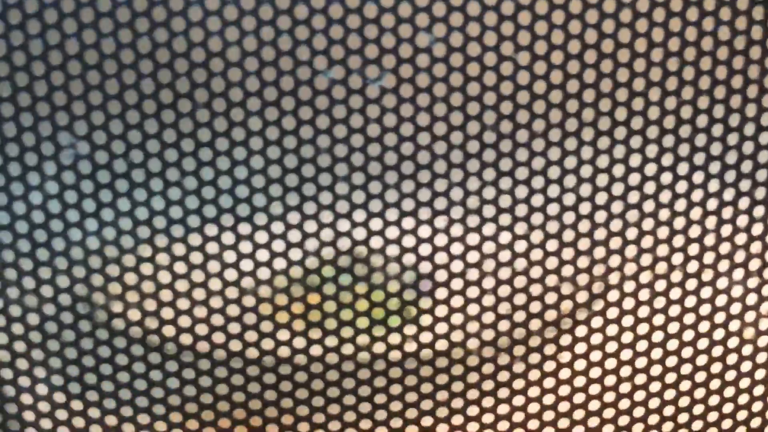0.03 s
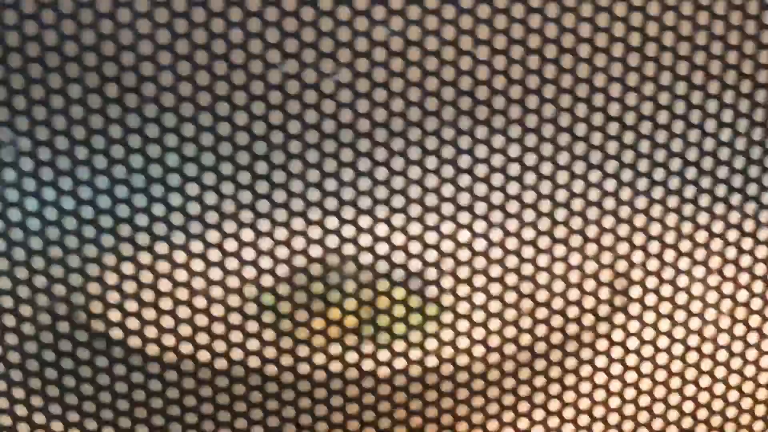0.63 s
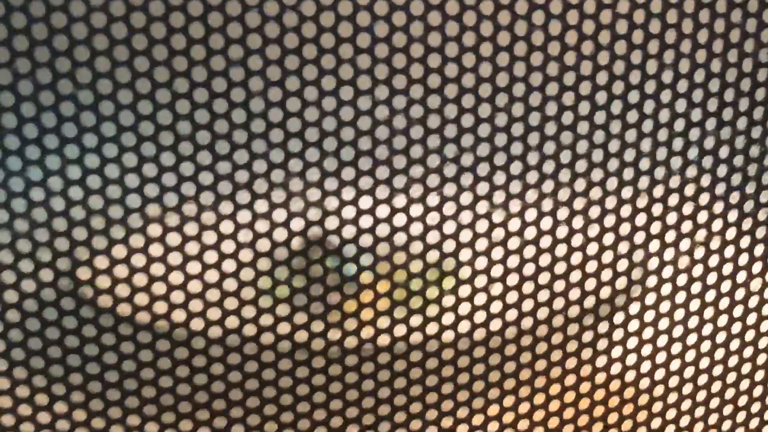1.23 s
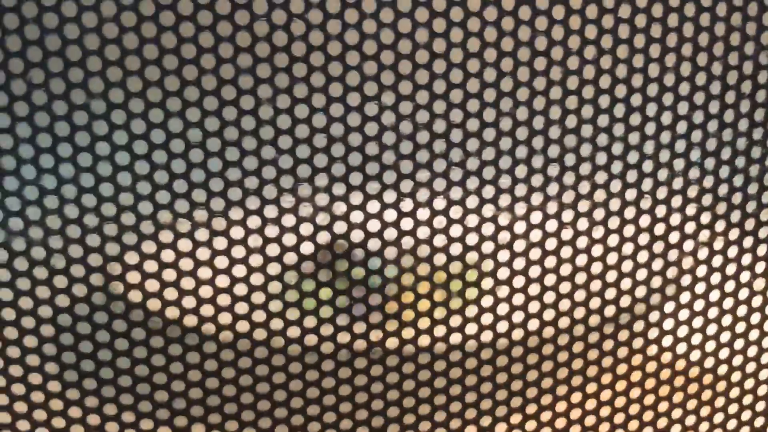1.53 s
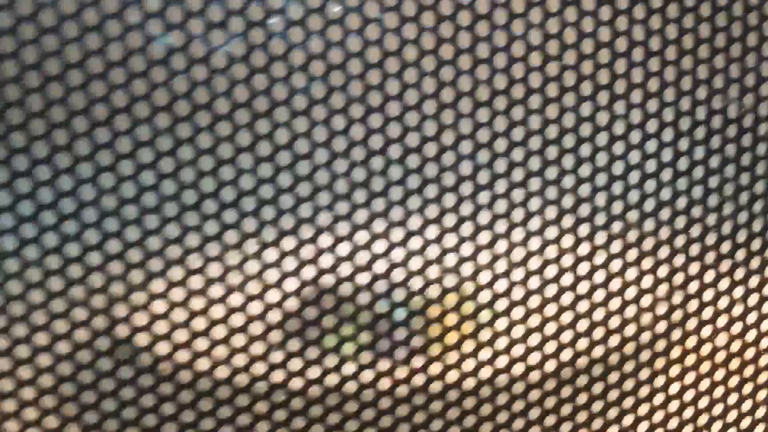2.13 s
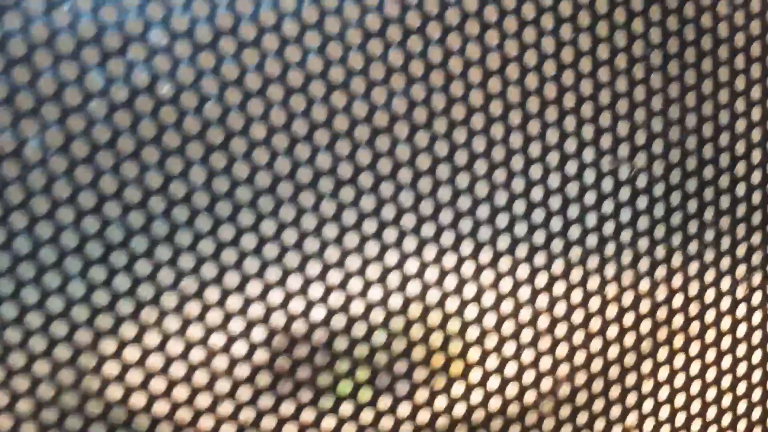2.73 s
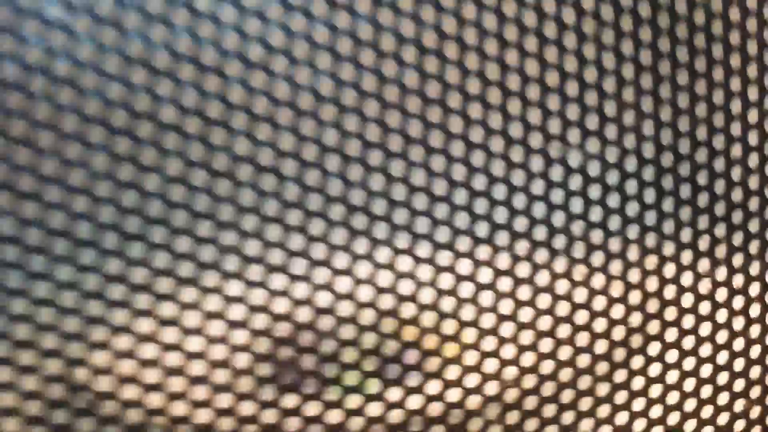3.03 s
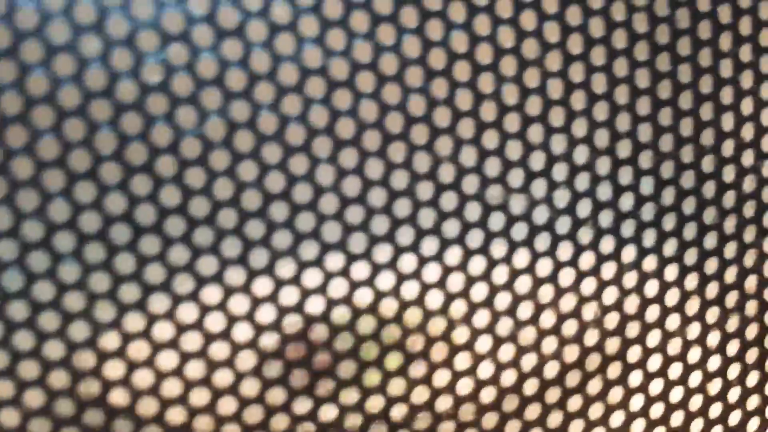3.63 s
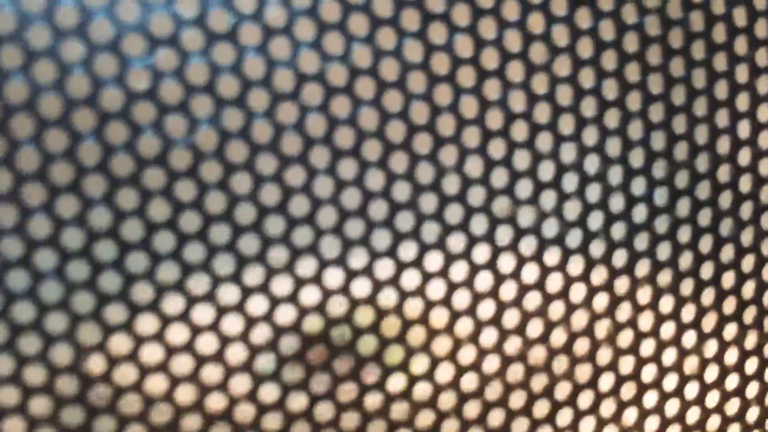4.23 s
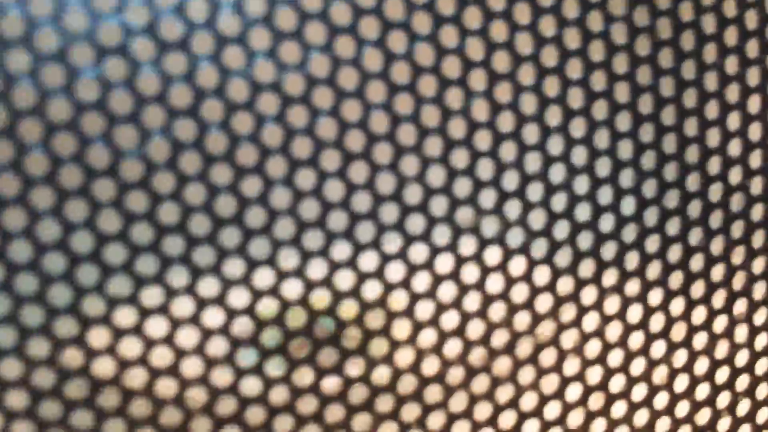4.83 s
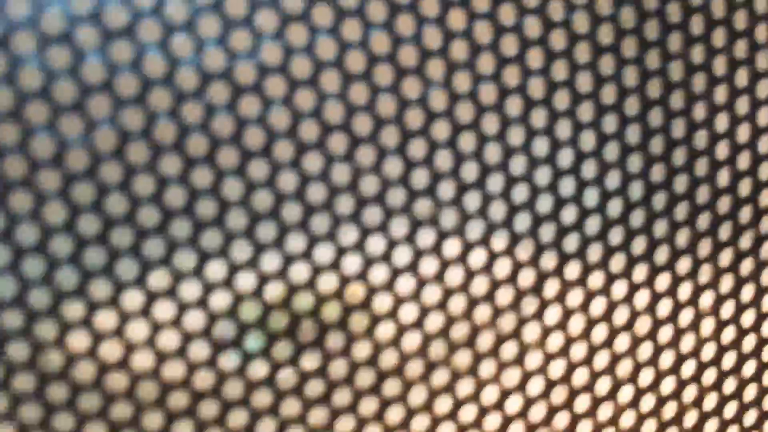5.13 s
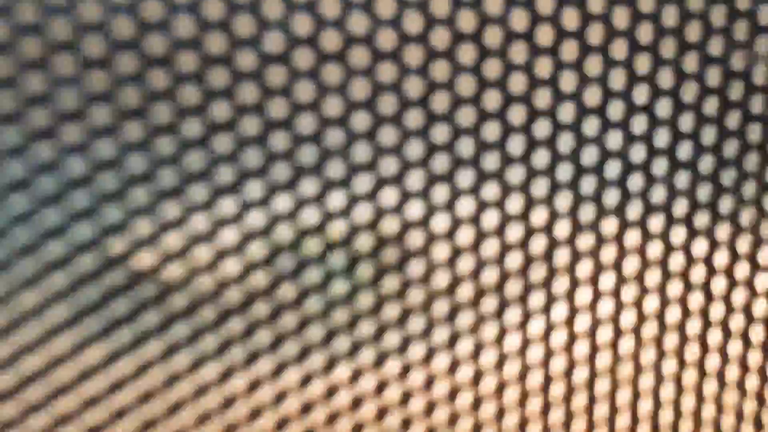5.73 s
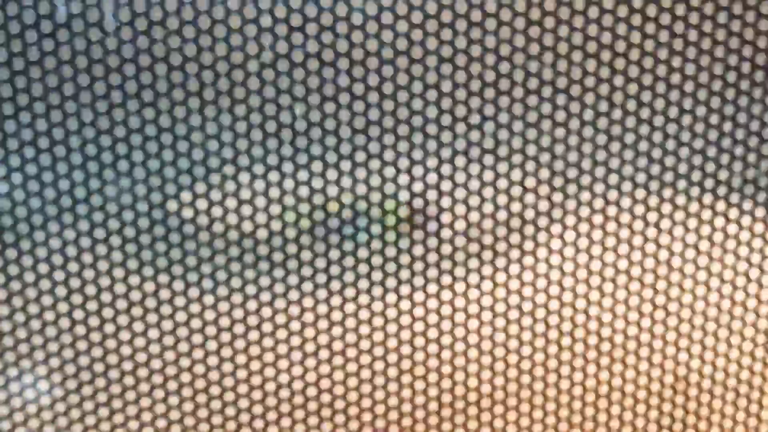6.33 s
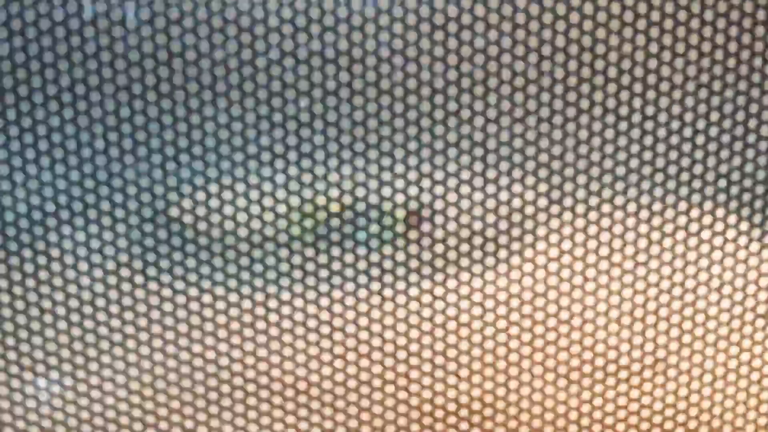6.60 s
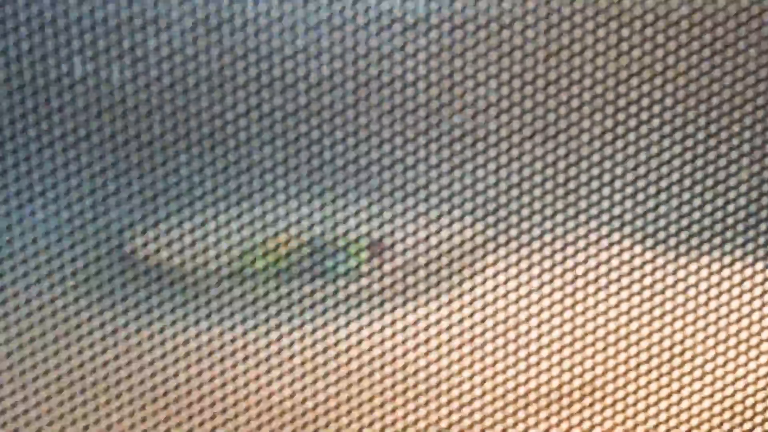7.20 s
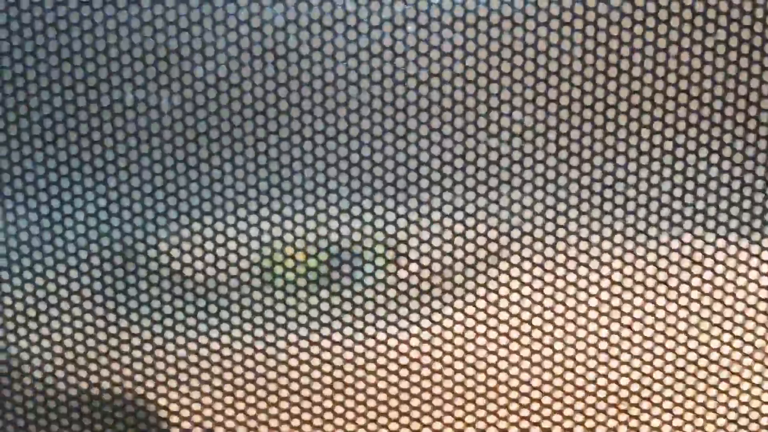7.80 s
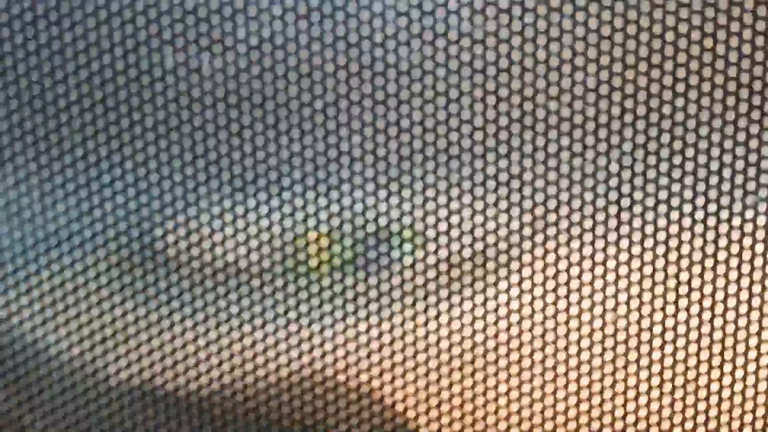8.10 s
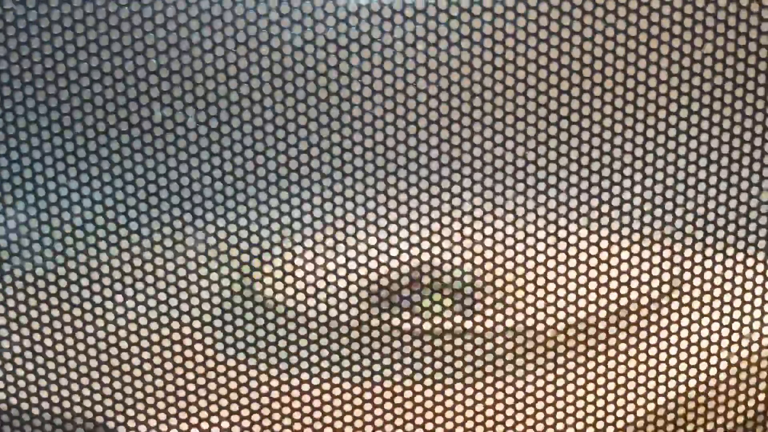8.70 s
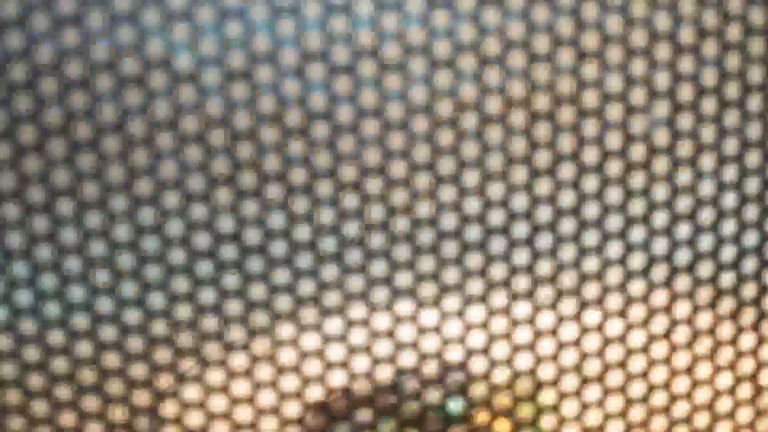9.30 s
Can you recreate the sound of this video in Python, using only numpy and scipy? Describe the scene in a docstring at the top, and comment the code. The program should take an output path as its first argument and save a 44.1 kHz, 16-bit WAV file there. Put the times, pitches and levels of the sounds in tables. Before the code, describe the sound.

A microwave oven runs in a kitchen, heard from just in front of its door. A steady low electric hum with a light buzz sits over the whir of the cooling fan, and the warming food gives a few faint ticks. From a little before halfway, fingers bump, tap and rub the hand-held microphone, building to a cluster of louder knocks and a scrape near the end. Then the sound cuts off.

```python
"""A kitchen, just in front of the door of a running microwave oven. The transformer hums at harmonics
of the mains, the casing buzzes and the magnetron sizzles once per mains cycle, the cooling fan whirs
and the warming food ticks; a faint hiss comes and goes. Fingers tap, jolt and rub the hand-held
camera, which ducks its bass after the heavier bumps; then the sound cuts off."""
import sys
import numpy as np
from scipy import signal
from scipy.fft import rfft, irfft, next_fast_len
from scipy.io import wavfile
from scipy.ndimage import uniform_filter1d, map_coordinates

SR = 44100
rng = np.random.default_rng(int(sys.argv[2]) if len(sys.argv) > 2 else 0)


def unload_wav(signal):
    """Save mono or channel-first audio to the path in sys.argv[1] as 16-bit WAV at rate SR, clipped to [-1, 1]."""
    wavfile.write(
        sys.argv[1],
        SR,
        np.round(np.clip(np.atleast_2d(signal).T, -1, 1) * 32767).astype(np.int16),
    )


N = 421155
MAINS_HZ = 59.992
STOP_S, TOP_HZ = 8.721, 15800

# Strong mains harmonics of transformer and panels. Each row: frequency in Hz, base rms level in dB.
HUM_PARTIALS = [(120, -30), (180, -56), (240, -45), (360, -48.5), (420, -68.5), (480, -71), (600, -57.5),
                (720, -67.5), (840, -65), (1080, -80), (1200, -73.5), (1260, -61), (1560, -70.5),
                (1920, -68.5), (2040, -67.5), (2100, -79), (2280, -69.5), (2520, -68), (2640, -68.5),
                (2880, -77.5), (3120, -75.5), (3240, -75), (3360, -71), (4080, -75.5), (4320, -79),
                (5400, -88)]
# The camera moves through the 240 Hz standing wave. Each row: time in seconds, gain in dB.
STANDING_WAVE = [(0, 1), (.4, 2), (1.3, -4.5), (1.9, 1.5), (2.25, -1), (2.9, 4), (4.8, -2), (5.5, 2.5),
                 (8.4, 0.5)]
# The hum grows as the camera nears the door. Each row: time in seconds, gain in dB.
DOOR_CLOSENESS = [(0, 0.8), (2, 1.3), (4.8, 1.5), (7.3, 0.4), (8.2, 2.5)]
# Spectra of the sheet steel's buzz, the magnetron, the cooling air, the fan motor, a food tick and
# the hiss. Each row: frequency in Hz, relative spectral density in dB.
CASING_SPECTRUM = [(300, -20), (500, -5.5), (1200, -1.5), (1700, -2), (2550, -6), (2950, -4.5),
                   (3350, -4.5), (3700, -5), (4300, -9), (4900, -10.5), (5400, -9.5), (6500, -16),
                   (8000, -31.5), (12000, -44)]
SIZZLE_SPECTRUM = [(2000, -24.5), (4500, -2.5), (6500, 6.5), (8000, -31.5), (10000, -23.5), (14000, -26)]
AIR_SPECTRUM = [(150, -5.5), (250, -0.5), (400, 1), (520, -4.5), (800, -6), (1250, -7.5), (1600, -12),
                (2500, -10.5), (2950, -20), (4300, -21.5), (5800, -33.5), (8000, -39), (11000, -45),
                (15800, -41)]
RUMBLE_SPECTRUM = [(18, -18), (35, -3.5), (55, 0), (90, -1), (140, -5.5), (200, -10.5), (300, -24),
                   (600, -70.5), (2000, -110)]
TICK_SPECTRUM = [(1500, -6), (3900, -13), (4600, 14), (5050, -4.5), (5600, 2.5), (7000, -11), (10000, -17),
                 (13000, -27.5), (16000, -41.5)]
HISS_SPECTRUM = [(2000, -13.0), (7000, -1.0), (15000, -7.0)]
# Resonances of vent and cavity. Each row: centre in Hz, width in Hz, boost in dB.
VENT_RESONANCES = [(347, 50, 5.5), (460, 160, 4), (627, 17, 6), (780, 82, 0.5), (1000, 44, 1.5),
                   (1280, 70, 3), (1780, 46, 6), (2050, 120, 4.5), (3335, 180, 7), (5630, 360, 7.5)]
# Double ticks of the food. Each row: start in seconds, peak level in dB.
FOOD_TICKS = [(1.508, -42.5), (2.58, -43), (2.668, -43), (8.1, -39), (8.117, -40.5)]
# Finger taps. Each row: time in seconds, click, knock and thump gains in dB, thump frequency in Hz.
FINGER_TAPS = [(4.376, -24, -11.5, -8, 135), (5.711, -54, -28, -18.5, 109), (5.75, -32, -17, -15.5, 112),
               (5.787, -54, -19.5, -34, 160), (5.8, -50, -18, -20, 135), (5.849, -54, -26, -15.5, 120),
               (5.916, -56, -26, -19.5, 101), (7.433, -23.5, -17.5, -35, 151),
               (7.807, -20.5, -10, -4.5, 165), (7.885, -13.5, 0.5, -1.5, 115),
               (7.992, -22.5, -6.5, -32.5, 149), (8.003, -15, -17, -32, 200), (8.282, -39, -13, -19, 100),
               (8.609, -24.5, -13.5, -9.5, 100.5), (8.704, -31, -23.5, -16.5, 71.5)]
# Modes of the camera shell. Each row: frequency in Hz, relative level in dB, 60 dB decay in seconds.
SHELL_MODES = [(327.7, 5, 0.058), (441, -5.5, 0.11), (545, -2, 0.11), (637, 6.5, 0.045), (766, 3, 0.023),
               (1004, -8.5, 0.013), (1270, -9, 0.0069)]
# Spectra of contacts with the shell. Each row: frequency in Hz, relative spectral density in dB.
KNOCK_SPECTRUM = [(60, -13), (200, 0.5), (450, -2), (800, -7.5), (1200, -4), (1600, -12), (2200, -33),
                  (5000, -59.5)]
SCRAPE_SPECTRUM = [(40, -22.5), (100, -0.5), (280, -1.5), (550, -4), (700, -4.5), (850, -11), (1250, -13),
                   (1550, -30.5), (3000, -43.5), (8000, -87.5)]
CLICK_SPECTRUM = [(400, -30), (1500, 9.5), (2400, 7), (3400, 5.5), (4200, 8), (5200, 3.5), (6800, -10),
                  (8500, -13.5), (13000, -30), (16000, -39)]
# Grip shifts. Each row: start in seconds, thump peak in dB, thump frequency in Hz, knock peak in dB.
GRIP_JOLTS = [(2.257, -26, 226, -49), (3.723, -10.5, 77, -37), (4.948, -24, 111, -43),
              (5.823, -13, 80, -27), (6.39, -24, 62, -42), (6.797, -19.5, 67, -52), (7.253, -28, 85, -48),
              (7.319, -17, 77, -51), (7.414, -14.5, 90, -28), (7.49, -25, 71, -28), (7.561, -15, 85, -32),
              (7.62, -9, 63, -27)]
# Finger slides. Each row: start and length in seconds, rumble and scrape gains in dB.
FINGER_RUBS = [(5.352, 0.34, -37.5, -54), (5.785, 0.036, -29, -37), (5.806, .22, -28.5, -64),
               (6.331, 0.16, -34, -47), (7.175, 0.17, -33.5, -67), (7.46, 0.23, -28, -46.5),
               (7.676, .105, -19.5, -24), (7.772, .155, -41, -32.5)]
# Stretches of hiss. Each row: start and end in seconds, level in dB.
HISS_SPANS = [(3.72, 4.133, -69), (5.684, 7.252, -68.5), (7.686, 8.4, -69.5), (8.598, 8.725, -69)]


def transformer_hum(overtone_drift_db=2.3, core_drift_db=0.27, flutter_db=.5):
    """Forced vibration: transformer and panels move at mains harmonics, most strongly the second."""
    t, out = clock(), np.zeros(N)
    for hz, db in HUM_PARTIALS:
        harmonic = round(hz / MAINS_HZ)
        level_db = db + (overtone_drift_db if harmonic > 4 else core_drift_db) * wobble(3)
        if harmonic == 4:
            level_db += curve(STANDING_WAVE)
        phase = 2 * np.pi * (harmonic * MAINS_HZ * t + rng.random())
        out += np.sqrt(2) * amp(level_db) * np.sin(phase)
    return out * amp(curve(DOOR_CLOSENESS) + flutter_db * wobble(14))


def casing_buzz(level_db=-61, odd_db=-4, size=2048):
    """Periodic forcing: each mains cycle shakes the casing alike, in a slowly shifting harmonic blend."""
    harmonic = np.arange(size // 2 + 1)
    strength = amp(along(CASING_SPECTRUM, harmonic * MAINS_HZ) + odd_db * (harmonic % 2))
    cycle_position = clock() * MAINS_HZ % 1
    out = np.zeros(N)
    for real, imag in rng.standard_normal(size=(3, 2, len(harmonic))):
        cycle = irfft(strength * (real + 1j * imag))
        out += wobble(.8) * np.interp(cycle_position, np.arange(size) / size, cycle)
    running_rms = np.sqrt(np.abs(uniform_filter1d(out ** 2, SR // 2)) + 1e-20)
    return amp(level_db) * out / running_rms


def magnetron_sizzle(level_db=-74, onset_cycles=0.57, decay_cycles=0.049, scatter_db=0.5):
    """Amplitude modulation: noise flares and decays at the same point of every mains cycle."""
    age = (clock() * MAINS_HZ - onset_cycles) % 1
    envelope = np.exp(-age / decay_cycles) * amp(scatter_db * wobble(33))
    return amp(level_db) * unit(envelope * noise(SIZZLE_SPECTRUM))


def cooling_fan(air_db=-46.0, rumble_db=-40.5, eddy_db=0.6):
    """Resonant filtering: vent and cavity colour the rushing air, over the motor's rumble."""
    def vent_gain(hz):
        return amp(sum(db / (1 + (2 * (hz - centre) / width) ** 2)
                       for centre, width, db in VENT_RESONANCES))
    air = unit(filtered(noise(AIR_SPECTRUM), vent_gain))
    return air * amp(air_db + eddy_db * wobble(12)) + amp(rumble_db) * noise(RUMBLE_SPECTRUM)


def food_ticks(gap_s=0.0062):
    """Impulsive sources: the warming food spits in pairs of bright ticks."""
    out = np.zeros(N)
    for start, db in FOOD_TICKS:
        for delay in (0, gap_s):
            tick = snap(TICK_SPECTRUM, t60=0.0039, tail_db=-15.5, tail_t60=0.027)
            add(out, start + delay, amp(db) * tick)
    return out


def finger_taps(shell_db=-1, click_lead_s=0.0027, rebound_s=.009):
    """Impact: the hard contact clicks, then the shell knocks and the whole camera thumps."""
    out = np.zeros(N)
    for start, click_db, knock_db, thump_db, hz in FINGER_TAPS:
        click = snap(CLICK_SPECTRUM, t60=0.0042, tail_db=-27.5, tail_t60=.045)
        impact = amp(knock_db + shell_db) * shell_knock() + amp(thump_db) * body_thump(hz)
        # the camera rocks back, softer and with its thump an octave lower
        rebound = amp(knock_db - 16) * shell_knock() + amp(thump_db - 3) * body_thump(hz / 2)
        add(out, start - click_lead_s, amp(click_db) * click)
        add(out, start, impact)
        add(out, start + rebound_s, rebound)
    return out


def shell_knock(ring_db=-13, muffle_hz=1350, bend_hz=550, detune=.06):
    """Modal ringing with dispersion: low bending waves travel more slowly, so a knock sweeps down."""
    blow = impulse(KNOCK_SPECTRUM)
    t = np.arange(len(blow)) / SR
    ring = np.zeros(len(t))
    for hz, db, t60 in SHELL_MODES:
        level_draw, pitch_draw = rng.standard_normal(2)
        envelope = amp(db + 2 * level_draw - 60 * t / t60)
        ring += envelope * np.sin(2 * np.pi * hz * (1 + detune * pitch_draw) * t)
    muffle = signal.butter(6, muffle_hz, fs=SR, output="sos")
    pole = np.exp(-2 * np.pi * bend_hz / SR)
    allpasses = [[-pole, 1, 0, 1, -pole, 0]] * 5  # these delay the lows
    return peaked(signal.sosfilt(np.vstack([muffle] + allpasses), blow + amp(ring_db) * ring))


def body_thump(hz, half_width_octaves=0.58, size=4096):
    """Damped oscillation: the whole camera swings, and the hand stills it in two or three cycles."""
    band_hz = hz * 2 ** (half_width_octaves * np.array([-1, 1]))
    grip = signal.butter(2, band_hz, "bandpass", fs=SR, output="sos")
    return peaked(signal.sosfilt(grip, signal.unit_impulse(size)))


def grip_jolts():
    """Soft impact: a shift of the grip excites mostly low frequencies, a thump with little knock."""
    out = np.zeros(N)
    for start, thump_db, hz, knock_db in GRIP_JOLTS:
        add(out, start, amp(thump_db) * body_thump(hz) + amp(knock_db) * shell_knock())
    return out


def finger_rubs(edge_s=0.0074, grain_db=5.0, swish_db=-24.5, scuff_db=-23):
    """Stick-slip friction: skin catches on the shell, in slides and in a brief scuff at each tap."""
    t, out = clock(), np.zeros(N)
    def stroke(start, length_s):
        return np.clip(np.minimum(t - start, start + length_s - t) / edge_s, 0, 1)
    slips = unit(amp(grain_db * wobble(110)))
    rumble = noise(RUMBLE_SPECTRUM)
    scrape = slips * (noise(SCRAPE_SPECTRUM) + amp(swish_db) * noise(CLICK_SPECTRUM))
    for start, length_s, rumble_db, scrape_db in FINGER_RUBS:
        out += stroke(start, length_s) * (amp(rumble_db) * rumble + amp(scrape_db) * scrape)
    for start, _, knock_db, _, _ in FINGER_TAPS:  # the fingertip lands just ahead of the knock
        out += stroke(start - 0.017, length_s=0.023) * amp(knock_db + scuff_db) * scrape
    return out


def faint_hiss():
    """Gated noise: an even treble hiss comes and goes."""
    t = clock()
    gate = sum(amp(db) * ((t > start) & (t < end)) for start, end, db in HISS_SPANS)
    return gate * noise(HISS_SPECTRUM)


def duck_bass(x, sense_hz=95, memory_s=0.05, lag_s=.035, threshold_db=-31, slope=1.4, deepest_db=8,
              shelf_hz=280):
    """Automatic gain control: the camera cuts its bass just after a burst of rumble, until it fades."""
    rumble = filtered(x, lambda hz: 1 / (1 + (hz / sense_hz) ** 16))
    pole = np.exp(-1 / (memory_s * SR))
    level_db = 10 * np.log10(signal.lfilter([1 - pole], [1, -pole], rumble ** 2) + 1e-12)
    cut_db = np.clip(slope * (level_db - threshold_db), 0, deepest_db)
    late_cut_db = np.interp(clock() - lag_s, clock(), cut_db)
    bass = filtered(x, lambda hz: 1 / (1 + (hz / shelf_hz) ** 4))
    return x - (1 - amp(-late_cut_db)) * bass


def snap(spectrum, t60, tail_db, tail_t60, rise_s=0.00054):
    """Two-stage decay: a gritty burst of coloured noise leaves a faint tail; peak 1."""
    colour = impulse(spectrum)
    t = np.arange(len(colour)) / SR
    envelope = (1 - np.exp(-t / rise_s)) * (amp(-60 * t / t60) + amp(tail_db - 60 * t / tail_t60))
    return peaked(signal.fftconvolve(envelope * rng.standard_normal(len(t)), colour))


def impulse(spectrum, size=4096):
    """The minimum-phase pulse with this spectrum; peak 1."""
    cepstrum = irfft(np.log(amp(along(spectrum, np.fft.rfftfreq(size, 1 / SR)))))
    cepstrum[1:size // 2] *= 2
    cepstrum[size // 2 + 1:] = 0
    return peaked(irfft(np.exp(rfft(cepstrum))))


def noise(spectrum):
    """Coloured noise of rms 1."""
    return unit(filtered(rng.standard_normal(N), lambda hz: amp(along(spectrum, hz))))


def filtered(x, gain):
    """Zero-phase filtering by a gain that depends on frequency."""
    size = next_fast_len(N + SR // 2)
    return irfft(rfft(x, size) * gain(np.fft.rfftfreq(size, 1 / SR)), size)[:N]


def wobble(rate):
    """A smooth random curve, rate knots a second."""
    grid = np.arange(0, N, 64)
    coarse = map_coordinates(rng.standard_normal(size=2048), [grid * rate / SR], mode="wrap")
    return np.interp(np.arange(N), grid, coarse)


def along(spectrum, hz):
    """A spectrum's level in dB, interpolated on a log frequency axis."""
    knots_hz, db = np.transpose(spectrum)
    return np.interp(np.log(hz + 1), np.log(knots_hz + 1), db)


def curve(rows):
    """Rows of time and value, joined by straight lines."""
    return np.interp(clock(), *np.transpose(rows))


def clock():
    return np.arange(N) / SR


def amp(db):
    return 10 ** (np.asarray(db) / 20)


def unit(x):
    return x / np.sqrt(np.mean(x ** 2) + 1e-20)


def peaked(x):
    return x / np.abs(x).max()


def add(track, start_s, sound):
    part = track[max(round(start_s * SR), 0):][:len(sound)]
    part += sound[:len(part)]


def scene():
    """Superposition: the oven's sound adds to the handling noises right at the microphone."""
    oven = transformer_hum() + casing_buzz() + magnetron_sizzle() + cooling_fan() + food_ticks()
    return (oven + finger_taps() + grip_jolts() + finger_rubs() + faint_hiss())[None]


def record(dry):
    """Gain control and band limiting: the bass ducks after bumps, and the sound stops abruptly."""
    running = np.clip((STOP_S - clock()) / .002, 0, 1)
    return filtered(duck_bass(dry[0]) * running, lambda hz: hz < TOP_HZ)[None]


dry = scene()
out = record(dry)
unload_wav(out)
```